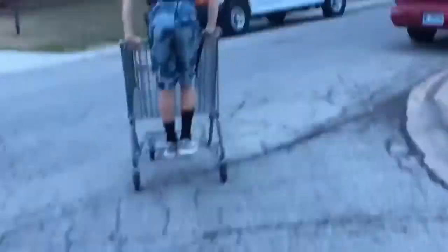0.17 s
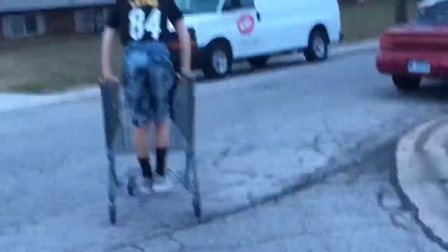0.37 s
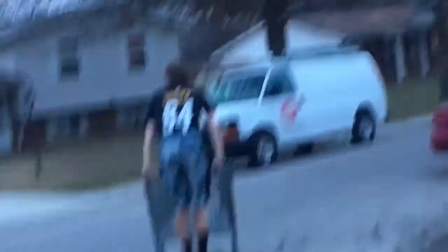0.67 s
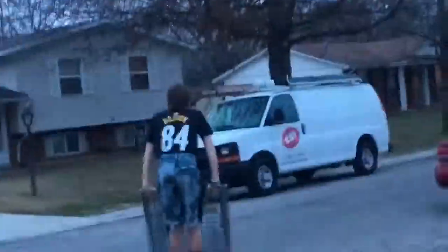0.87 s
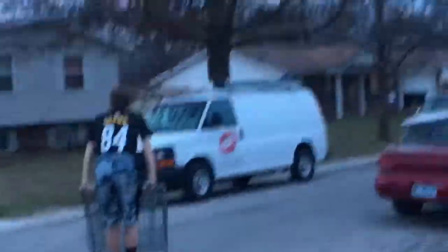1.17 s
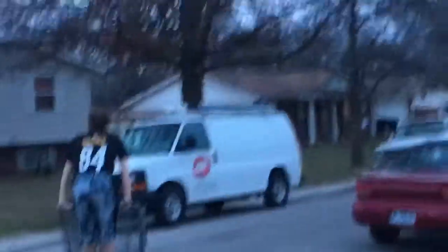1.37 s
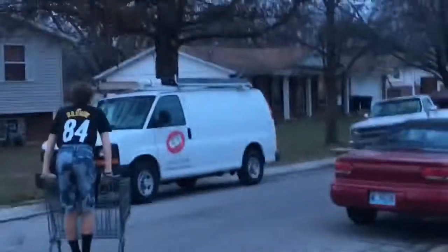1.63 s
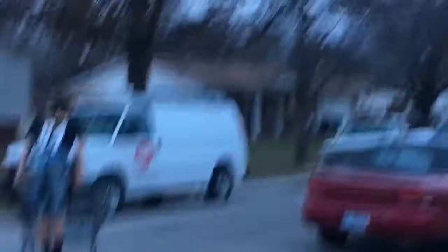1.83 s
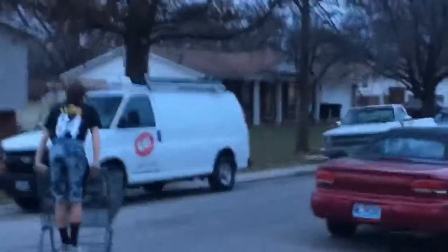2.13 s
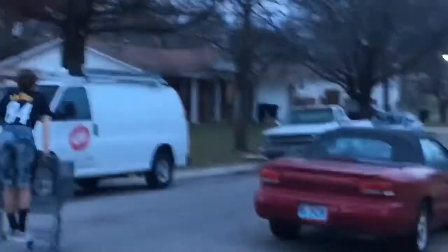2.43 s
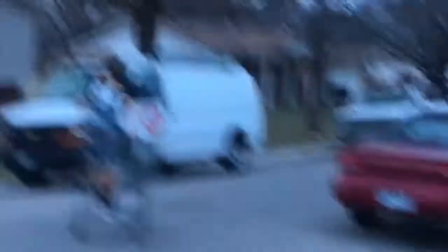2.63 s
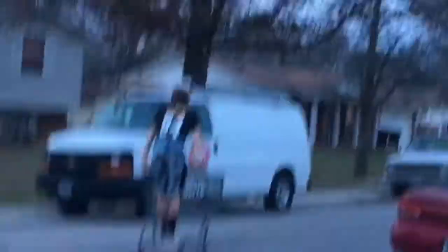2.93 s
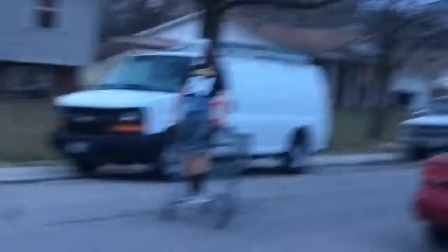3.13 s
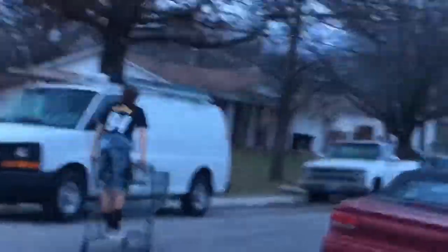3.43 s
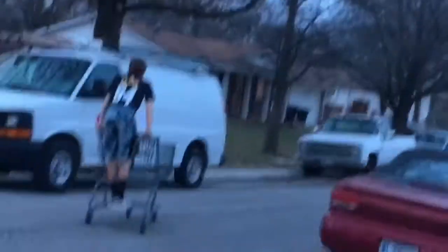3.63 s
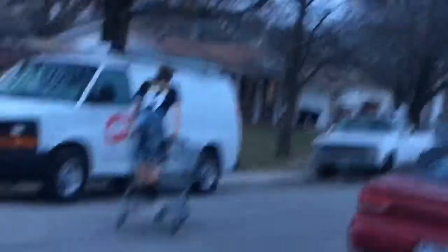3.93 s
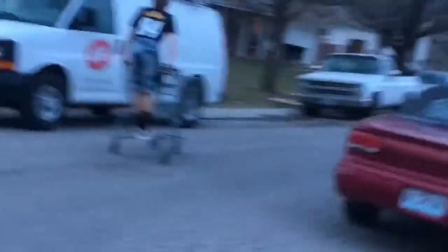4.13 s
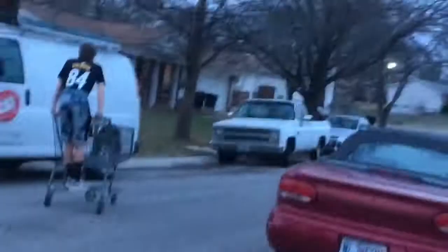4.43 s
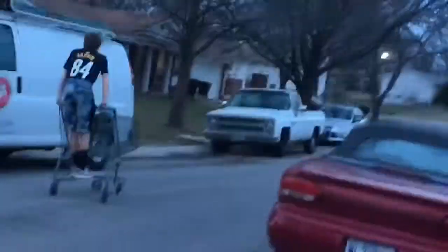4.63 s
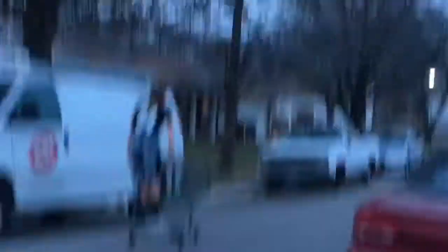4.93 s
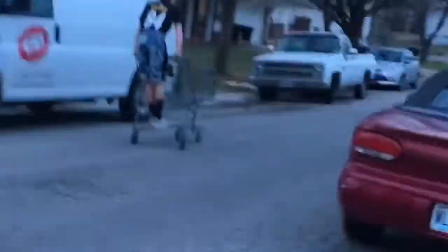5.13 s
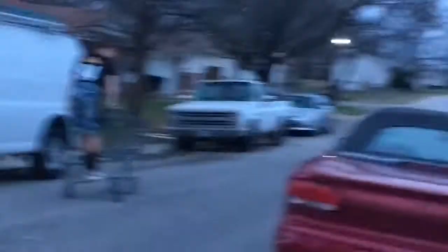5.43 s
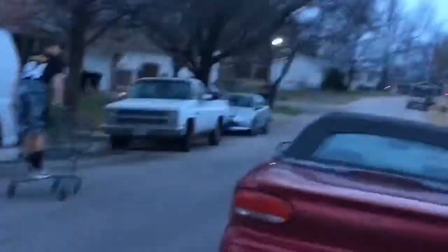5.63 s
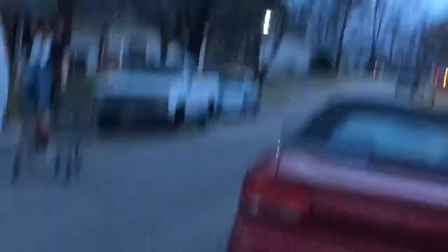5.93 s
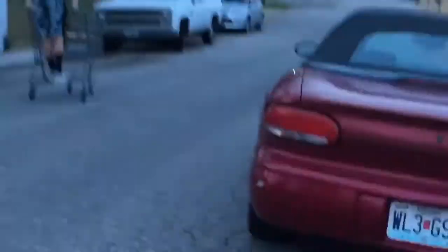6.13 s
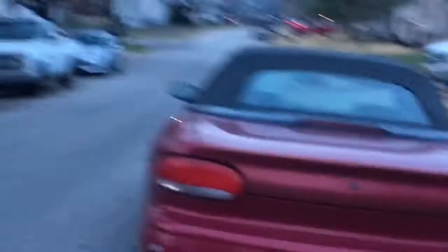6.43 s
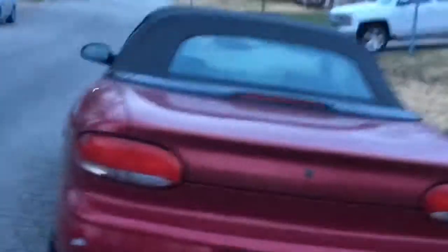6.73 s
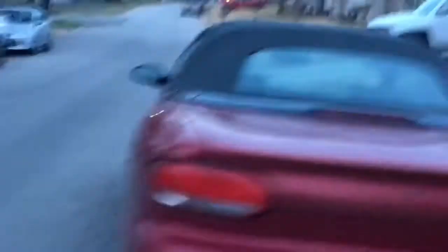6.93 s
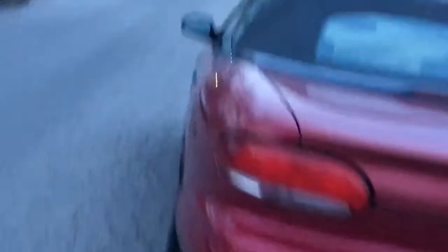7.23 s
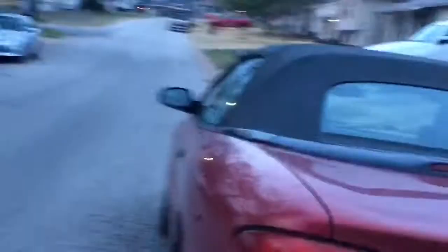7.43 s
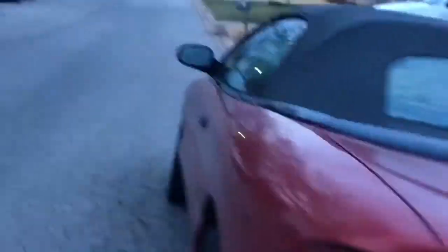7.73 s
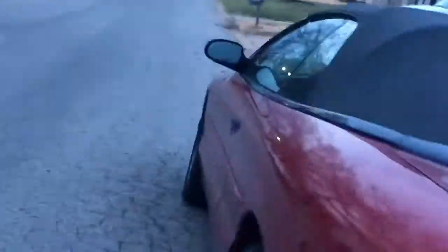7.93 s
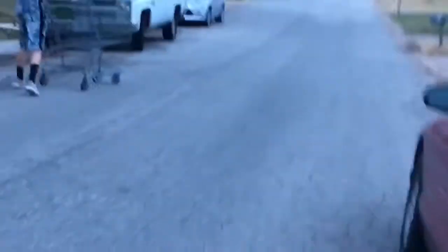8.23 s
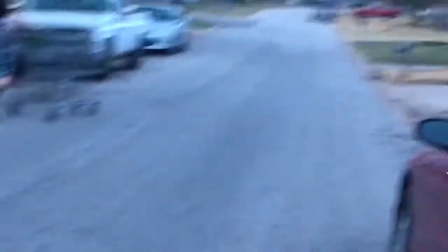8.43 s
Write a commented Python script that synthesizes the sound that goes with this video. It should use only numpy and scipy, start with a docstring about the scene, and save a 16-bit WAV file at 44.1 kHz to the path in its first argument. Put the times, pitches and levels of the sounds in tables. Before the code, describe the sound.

Harsh metallic cart clatter with hard wheels knocking on rough road recedes down a street; nearby gritty footsteps and faint bird whistles follow.

```python
"""Shopping cart on cracked asphalt

A wire shopping cart with a rider rolls away along a quiet street, heard by one microphone.
Hard wheels tapped by stones and a knocked tube frame ring; the shaken wires make a dense jingle.
Grit snaps under the shoes of a walker close by, as short pulses with a noisy edge.
Filtered noise gives a low rumble of wind and microphone handling under an upper background wash,
and a bird gives a few short gliding whistles.
"""
import sys
import numpy as np
from scipy import signal
from scipy.io import wavfile
from scipy.ndimage import uniform_filter1d

SR = 44100
rng = np.random.default_rng(int(sys.argv[2]) if len(sys.argv) > 2 else 0)


def store_pcm(level_fs):
    """Save levels as 16-bit WAV."""
    pcm = np.round(np.clip(level_fs, -1, 1) * 32767).astype(np.int16)
    wavfile.write(sys.argv[1], SR, np.atleast_2d(pcm).T)


N = 379069  # length in samples

# All levels are relative: the functions below add further gains.
# colour of the background noise: f/Hz, level/dB
BACKGROUND_SPECTRUM = [(12, -47), (20, -40), (44, 0), (65, 2), (124, 0), (225, -6), (282, -11),
                       (370, -10.5), (445, -24.5), (520, -12), (600, -14), (780, -9.5), (1320, -120)]
# swells of the background: t/s, low rumble level/dB, upper wash level/dB
BACKGROUND_SWELLS = [(0.02, -66, -58), (0.09, -51, -54), (0.35, -62, -65), (0.4, -57, -49.5),
                     (0.66, -56.5, -60), (0.9, -49, -52.5), (2.04, -49, -55), (2.28, -44.5, -49),
                     (2.57, -56, -57), (3.09, -50.5, -48.5), (3.47, -61, -47.5), (3.52, -50, -48.5),
                     (3.91, -53.5, -45.5), (4.69, -52.5, -51.5), (6.74, -45.5, -53.5), (6.98, -52.5, -50.5),
                     (7.82, -43.5, -53), (8.58, -50.5, -54.5)]
# bird whistles: start t/s, length/s, first f/Hz, last f/Hz, level/dB
CHIRPS = [(1.543, 0.047, 2980, 2920, -43), (1.577, 0.032, 2740, 2610, -44), (7.902, 0.057, 4360, 4280, -48),
          (7.95, .016, 3900, 2800, -52), (8.076, 0.042, 3300, 2650, -48), (8.07, .03, 4300, 4100, -53),
          (8.215, 0.014, 3500, 4000, -52), (8.224, 0.043, 3420, 3240, -53), (8.363, 0.028, 4120, 4540, -52),
          (8.367, 0.042, 3570, 3500, -49.5), (8.394, 0.026, 3380, 2800, -53),
          (8.419, 0.15, 2760, 2700, -57)]
# snaps of grit and knocks of shoes near the microphone: t/s, level/dB, f/Hz, cycles, gritty edge level/dB
GRIT_SNAPS = [(2.264, -25, 1710, 4.1, -10), (2.2645, -21.5, 3860, 4.8, -19), (5.755, -30, 2590, 5.4, -10),
              (5.848, -23, 2180, 3.3, -10.5), (5.868, -26, 2400, 3, -12), (5.882, -27, 2000, 2.5, -10),
              (5.911, -44, 2000, 3, -14), (5.922, -31, 2400, 7, -23), (5.9335, -15, 990, 1.9, -15),
              (5.9342, -17, 2400, 3.5, -34), (5.928, -33, 2600, 4, -14), (5.9515, -34, 2200, 7.1, -16),
              (5.9637, -27, 3580, 4.9, -8), (6.068, -37, 1900, 5.6, -15), (6.178, -42, 2630, 11, -6),
              (6.344, -29.5, 2420, 3.3, -4), (6.368, -32.5, 1100, 4.8, -9), (6.551, -26.5, 1190, 1.7, -8),
              (6.627, -33, 2570, 5.8, -18), (6.844, -25.5, 1230, 4.1, -13), (6.974, -36, 880, 2.7, -8),
              (6.992, -38, 2500, 1.9, 5.5), (7.276, -30, 646, 5.5, -18), (7.348, -37, 1010, 2.5, -10),
              (7.379, -30, 740, 2, -18), (7.494, -36, 1040, 1.6, -14), (7.540, -38, 2630, 2.2, -21),
              (7.638, -33.5, 2710, 13, -13), (8.009, -36, 1500, 3, -16), (8.503, -41, 1790, 63, -5),
              (8.528, -34, 845, 3, -20), (8.574, -35, 2520, 5.7, -16), (8.5745, -36, 1200, 4, -16)]

# cracks and ridges that jolt the whole cart: t/s, wheels level/dB, basket level/dB, frame tube level/dB
JOLTS = [(0.046, -54, -36, -61.0), (0.075, -46, -48, -52), (0.11, -52, -53, -45), (0.163, -64, -55, -62),
         (0.211, -54, -39, -52), (0.247, -43.5, -34.5, -32.5), (0.351, -44.0, -30, -36),
         (0.404, -38, -33, -30), (0.42, -45, -26, -51), (0.476, -45, -31.5, -37), (0.55, -39.5, -31.5, -46),
         (0.597, -46, -41, -58), (0.658, -46, -43, -41), (0.7, -48, -46.0, -37.5),
         (0.802, -36.5, -39, -35.5), (0.853, -40.5, -58, -59), (0.992, -43, -54, -61),
         (1.063, -46, -38, -63.0), (1.212, -41.5, -51, -54), (1.34, -63, -53, -52),
         (1.413, -59, -44.5, -65.0), (1.57, -48, -45, -68), (1.676, -47.5, -43.0, -79),
         (1.807, -43.5, -41, -66), (1.856, -43, -38.5, -62), (1.946, -46.0, -38.5, -68.0),
         (2.186, -55, -49, -66), (2.245, -48, -44, -56), (2.29, -55, -44.5, -62), (2.36, -50, -63, -59),
         (2.46, -50, -52, -41.5), (2.583, -53, -39, -44), (2.744, -43, -40.5, -50), (2.968, -44, -38, -39),
         (3.02, -48, -41.0, -62), (3.112, -43.5, -52.0, -41.5), (3.2, -58, -46, -47), (3.25, -48, -55, -32),
         (3.299, -46, -38, -40), (3.389, -39.5, -42, -34), (3.504, -42.0, -35, -34), (3.606, -60, -54, -45),
         (3.699, -40.5, -35.5, -45), (3.79, -40, -54, -36), (3.848, -40.0, -30.5, -35),
         (3.98, -39.5, -32.5, -55), (4.133, -41.0, -36.5, -78), (4.22, -44, -37.5, -67),
         (4.47, -49.5, -46, -62), (4.519, -46, -40, -45), (4.577, -47, -39, -44.5),
         (4.676, -47.0, -42, -73), (4.8, -48.5, -42.5, -48.0), (4.887, -43, -43.0, -68.0),
         (5.005, -46.5, -64, -46), (5.105, -64, -66, -46), (5.156, -81, -43.5, -65.0),
         (5.26, -50.5, -44.5, -45), (5.335, -50, -64, -58), (5.373, -46.5, -44.5, -50),
         (5.47, -63, -46, -46.0), (5.642, -60, -72, -48), (5.75, -60.0, -53, -53), (5.831, -44.5, -48, -51),
         (5.986, -67, -47.5, -58.0), (6.29, -71, -53, -70.0), (6.324, -51.5, -57, -51),
         (6.44, -72, -48.5, -63), (6.525, -55.0, -47, -56), (6.648, -53.0, -45.5, -75),
         (6.72, -57, -52.0, -60.0), (6.831, -47, -49.5, -51), (6.966, -49.5, -49.5, -48),
         (7.09, -56, -57, -50), (7.146, -57, -57.0, -44), (7.345, -71, -57, -74.0),
         (7.55, -56, -53.5, -75.0), (7.625, -56, -46.5, -47), (7.797, -58, -65.0, -50.0),
         (7.887, -56.0, -61, -57.0), (7.997, -60, -58, -46), (8.02, -57, -52.5, -50),
         (8.227, -71, -52.5, -48.0), (8.484, -66.0, -48.5, -45.0)]
# steady rolling between jolts, set by road roughness and distance: t/s, wheels level/dB, basket level/dB
ROLLING = [(0.0, -39.5, -33.5), (0.45, -49.5, -35), (0.9, -44.5, -39.0), (1.3, -42.5, -39.5),
           (1.65, -51.5, -50.5), (2.1, -46, -41.5), (2.9, -47, -42.5), (3.5, -46, -37.5), (4.0, -43, -35.5),
           (4.4, -47.5, -42), (5.1, -50.5, -49), (5.7, -51.5, -51), (6.25, -53, -52.5), (6.8, -51.5, -51.5),
           (7.5, -59.0, -59.5), (7.9, -50, -50.5), (8.25, -55, -55), (8.6, -51.5, -62)]
# brief dips of the rattle, most just before a jolt; plus means louder: middle t/s, length/s, level/dB
LULLS = [(0.406, 0.015, -4), (1.313, 0.057, -5.5), (1.397, .03, -2.5), (1.64, 0.062, -0.5),
         (1.79, 0.035, 1.5), (1.935, 0.039, -1.5), (2.146, 0.037, -3), (2.545, 0.035, -2.5),
         (2.883, 0.056, -1), (3.182, 0.032, -2), (3.667, 0.056, -1.5), (4.443, 0.034, 0.5),
         (5.15, 0.042, -5), (5.722, 0.047, -3), (6.257, 0.07, -5), (7.32, 0.043, -3), (7.52, 0.082, -2.5),
         (8.1, 0.068, -3), (8.45, .07, 3.5)]
# single stones that a wheel hits squarely: t/s, level/dB
STONE_KNOCKS = [(0.048, -24), (0.056, -21), (0.077, -27), (0.101, -23), (0.108, -19), (0.163, -24),
                (0.195, -31), (0.212, -23), (0.225, -24), (0.25, -31), (0.429, -22), (0.477, -22),
                (0.595, -21), (0.605, -30), (0.658, -21), (0.702, -23), (0.802, -25), (0.853, -17),
                (0.992, -25.5), (1.807, -28), (2.185, -32), (2.461, -34), (2.743, -26), (2.969, -29),
                (3.791, -25), (3.849, -20), (4.134, -26), (4.466, -24), (4.578, -21), (4.929, -32),
                (5.106, -28), (5.335, -31)]
# struck modes (ways of ringing) of the frame, axle first: f/Hz, width/Hz, level/dB
FRAME_MODES = [(624, 51, -14), (860, 92, -7), (839, 27, -21), (932, 72, -1)]
# colour of the wheel sound: f/Hz, level/dB
WHEEL_SPECTRUM = [(280, -36), (480, -24), (607, -11.5), (850, -8.5), (1530, -7), (1960, -8.5), (2290, -8.5),
                  (2590, -5.5), (4500, -16), (5850, -31), (9900, -120)]
# broad resonances of wheels and lower rack: f/Hz, width/Hz, level/dB
RACK_RESONANCES = [(1180, 240, 2.5), (1910, 540, 5.5), (2650, 260, 1), (2690, 230, 1)]
# colour of the basket sound: f/Hz, level/dB
BASKET_SPECTRUM = [(1880, -20.5), (3200, -4), (6170, -2), (6810, 2.5), (7520, 0), (11300, -3), (14200, -3),
                   (15600, -6.5)]
# groups of basket wires of like length: f/Hz, width/Hz, level/dB
WIRE_GROUPS = [(5700, 1200, 1.5), (7000, 600, -1), (6970, 180, -2), (8640, 540, 3.5), (9540, 790, 5.5),
               (10000, 300, 0.5), (11080, 490, 7), (12050, 360, 9), (12840, 200, 8), (14700, 1400, 4.5)]
# changing brightness of the basket's top treble, dullest at the end: t/s, level/dB
BASKET_TREBLE = [(0, -2.5), (3, -2), (5, 0), (6, -5), (7.5, -3.5), (8.6, -8.5)]
# bands cancelled by the road echo, drifting with the path: t/s, low f/Hz, depth 0-1, high f/Hz, depth 0-1
ROAD_NOTCHES = [(0, 1490, 0, 2310, 0.5), (.5, 1500, 0.03, 2270, 0.4), (1.8, 1480, 0, 2450, 0),
                (2.4, 1600, 0.5, 2350, 0.3), (3.2, 1620, 0.45, 2340, .8), (4.0, 1530, 0.65, 2320, 0.8),
                (4.6, 1470, 0.46, 2280, 0.6), (5.2, 1580, 0.83, 2270, 1), (5.8, 1610, 0.07, 2300, 0.9),
                (6.5, 1680, 0.7, 2150, 0.9), (7.5, 1600, 0.1, 2120, .8), (8.6, 1390, 0.65, 2230, 0.9)]

# how each part answers a jolt: (rise s, dying away s, abruptness of the end: 1 = even decay)
WHEELS_SETTLE, BASKET_SETTLE, TUBE_SETTLE = (0.0057, 0.13, 1.5), (0.0099, 0.11, 1.46), (0.0047, 0.046, 0.64)
WHEELS_HUSH = 0.55  # share of a lull that reaches wheels and frame
MAIN_HZ = 855.4  # middle pitch of the main frame tube, which wanders around it
TUBE_BELOW_WHEELS_DB = -8.5  # steady ring of the frame tube, before its own gain
NEAR_CLATTER_DB, NEAR_S = 7.5, 1.2  # extra clatter of the neighbour tubes close by; time to roll out of reach
EDGE_HZ = 15740  # upper limit of the whole sound


def gain_of(db):
    """Turns decibels into a factor."""
    return 10 ** (np.asarray(db) / 20)


def evened(x):
    """Scales a sound to an average strength (rms) of 1."""
    return x / np.sqrt(np.mean(x ** 2) + 1e-20)


def curve(rows, column=1):
    """Draws straight lines between the rows of a table: one column's value at every sample."""
    table = np.array(rows)
    return np.interp(np.arange(N) / SR, table[:, 0], table[:, column])


def drift(length):
    """Random wander of rms 1 that changes over about length seconds."""
    size = max(round(length * SR), 2)
    smooth = uniform_filter1d(rng.standard_normal(N), size)
    return evened(uniform_filter1d(smooth, size))


def add(mix, s, sound):
    """Mixes a sound in, starting at s seconds."""
    part = mix[max(round(s * SR), 0):][:len(sound)]
    part += sound[:len(part)]


def ringing(hits, ring):
    """Every hit starts its own copy of the ring, as loud as the hit."""
    return signal.oaconvolve(hits, ring)[:N]


def colour(x, points, peaks=()):
    """Shapes a sound by a spectrum with resonance humps; nothing rings before it is struck."""
    hz = np.fft.rfftfreq(8192, 1 / SR)
    f, db = np.transpose(points)
    level_db = np.maximum(np.interp(np.log(hz + 1), np.log(f + 1), db), -100)
    for centre, width, up_db in peaks:
        level_db = level_db + up_db / (1 + (2 * (hz - centre) / width) ** 2)
    mirrored_db = np.r_[level_db, level_db[-2:0:-1]]
    log_gain = np.log(gain_of(mirrored_db))
    # minimum phase: the energy comes as early as this spectrum allows
    phase = -signal.hilbert(log_gain).imag
    ring = np.fft.ifft(np.exp(log_gain + 1j * phase)).real[:4096]
    return signal.oaconvolve(x, ring / np.linalg.norm(ring))[:len(x)]


def resonate(x, hz, width):
    """Keeps a narrow band around a moving frequency, with gain 1 at its middle."""
    turn = np.exp(2j * np.pi * np.cumsum(hz) / SR)
    r = np.exp(-np.pi * width / SR)
    # shift the band down to zero, smooth it there, then shift it back
    low = signal.lfilter([1 - r], [1, -r], x / turn)
    return 2 * (turn * low).real


def taps(per_s, spread_db):
    """Small impacts at random moments; a few are large."""
    size = gain_of(spread_db * np.minimum(rng.exponential(1, N), 5))
    struck = rng.random(N) < per_s / SR
    return size * struck * rng.choice([-1., 1.], N)


def jolts(rows, column, bounce_s):
    """Each jolt is a blow followed by a quickly dying run of rebounds, made of fading noise."""
    out, t = np.zeros(N), np.arange(round(.1 * SR)) / SR
    for row in rows:
        rebounds = np.exp(-t / bounce_s) * rng.standard_normal(len(t))
        add(out, row[0], gain_of(row[column]) * rebounds)
    return out


def many_modes(t60):
    """Ring with partials so crowded that it is fading noise, down 60 dB after t60 seconds."""
    t = np.arange(round(.2 * SR)) / SR
    ring = gain_of(-60 * t / t60) * rng.standard_normal(len(t))
    return ring / np.linalg.norm(ring)


def shaking(steady_db, column, settle, hush):
    """Strength of a part's rattle: steady rolling plus a quick rise and slow settling after every jolt."""
    rise_s, decay_s, abruptness = settle
    t, kicks, lull_db = np.arange(SR // 2) / SR, np.zeros(N), np.zeros(N)
    for row in JOLTS:
        kicks[round(row[0] * SR)] += gain_of(2 * row[column])  # doubled dB: power
    for s, length, db in LULLS:
        add(lull_db, s - length, db * np.hanning(round(2 * length * SR)))
    answer = (1 - np.exp(-t / rise_s)) * np.exp(-(t / decay_s) ** abruptness)
    jolt_power = abs(ringing(kicks, answer ** 2))
    return gain_of(hush * lull_db) * np.sqrt(gain_of(2 * steady_db) + jolt_power)


def rolling():
    """Strength of the knocking of wheels and rack."""
    return shaking(curve(ROLLING), column=1, settle=WHEELS_SETTLE, hush=WHEELS_HUSH)


def background():
    """A low, slightly lumpy rumble of wind and microphone handling, under an upper wash with its own swells."""
    lumps_db = 2.45 * drift(0.045)
    noise = colour(rng.standard_normal(N), BACKGROUND_SPECTRUM)
    rumble = signal.sosfiltfilt(signal.butter(2, 135, fs=SR, output="sos"), noise)
    wash = noise - rumble
    rumble_gain = gain_of(curve(BACKGROUND_SWELLS) + lumps_db)
    wash_gain = gain_of(curve(BACKGROUND_SWELLS, column=2))
    return rumble_gain * evened(rumble) + wash_gain * evened(wash)


def bird():
    """Short gliding whistles from a distance, fluttering and smeared by echoes off the houses."""
    out = np.zeros(N)
    for s, length, first_hz, last_hz, db in CHIRPS:
        hz = np.linspace(first_hz, last_hz, round(length * SR))
        hz = hz * (1 + 0.09 * uniform_filter1d(rng.standard_normal(len(hz)), 150))
        whistle = np.sin(2 * np.pi * np.cumsum(hz) / SR)
        add(out, s, gain_of(db - 1.5) * signal.windows.tukey(len(hz), .7) * whistle)
    out = out * gain_of(4 * drift(.004))  # flutter in loudness
    return out + gain_of(-5) * ringing(out, many_modes(.12))


def snaps():
    """Dry pulses of a few cycles that swell for an instant before their peak, each with a gritty edge."""
    out, t = np.zeros(N), np.arange(-.004, .026, 1 / SR)  # the peak is at t = 0
    for s, db, hz, cycles, grit_db in GRIT_SNAPS:
        life = hz * t / max(cycles, .3)
        pulse = np.exp(np.where(t < 0, 5.0, -2.5) * life) * np.cos(2 * np.pi * hz * t)
        noise = np.convolve(rng.standard_normal(len(t)), [.6, 1, .6], "same")
        grit = gain_of(grit_db) * np.exp(-abs(t) / 0.00077) * noise
        add(out, s + t[0], gain_of(db) * (pulse - pulse.mean() + grit))
    return out


def frame():
    """The main tube sings almost steadily; taps and jolts ring its neighbours, and the axle follows the wheels."""
    t = np.arange(round(.2 * SR)) / SR
    modes = []
    for hz, width, db in FRAME_MODES:
        fade = np.exp(-np.pi * width * t)  # a wider resonance dies away sooner
        modes.append(gain_of(db) * np.sqrt(width) * fade * np.sin(2 * np.pi * hz * t))
    axle = evened(ringing(taps(400, 4.0), modes[0]))
    neighbours = evened(ringing(taps(900, 3.5), sum(modes[1:])))
    main_hz = MAIN_HZ + 10 * drift(0.0272)
    main = gain_of(3.1 * drift(0.022)) * np.sin(2 * np.pi * np.cumsum(main_hz) / SR)
    # close by, the neighbours clatter over the ring of the main tube
    nearness = np.exp(-(np.arange(N) / SR / NEAR_S) ** 2)
    clatter = gain_of(-3 + NEAR_CLATTER_DB * nearness)
    tube = (evened(main) + clatter * neighbours) / np.sqrt(1 + clatter ** 2)
    tube_db = curve(ROLLING) + TUBE_BELOW_WHEELS_DB
    tube_shake = shaking(tube_db, column=3, settle=TUBE_SETTLE, hush=WHEELS_HUSH)
    tube = gain_of(2.5 + 2.0 * drift(0.052)) * tube_shake * tube
    blows = ringing(jolts(JOLTS, column=3, bounce_s=0.0063), sum(modes))
    return gain_of(-9.5) * rolling() * axle + tube + gain_of(-39.5) * blows


def pings():
    """Loose parts of the rack are struck alone and sound short pitched ticks."""
    t, out = np.arange(round(.06 * SR)) / SR, 0
    for hz in np.geomspace(950, 3800, num=10):
        tick = gain_of(-60 * t / 0.023) * np.sin(2 * np.pi * hz * t)
        out = out + ringing(taps(25, 1.8), tick)
    return evened(out)


def wheels():
    """Stones tap the hard wheels; the load shifts between contact points, so the dull rings change."""
    chatter = np.zeros(N)
    for _ in range(8):  # contact points
        load = gain_of(2.35 * drift(0.064))
        chatter += load * ringing(taps(110, 2.56), many_modes(0.066))
    chatter = chatter / np.sqrt(uniform_filter1d(chatter ** 2, SR // 8))  # the total load stays even
    rattle = colour(chatter + gain_of(-14.5) * pings(), WHEEL_SPECTRUM, RACK_RESONANCES)
    steady = gain_of(1.64) * rolling() * evened(rattle)
    knocks = jolts(STONE_KNOCKS, column=1, bounce_s=0.0021)
    return steady + gain_of(-5.5) * colour(knocks, WHEEL_SPECTRUM, RACK_RESONANCES)


def basket():
    """Loose wires chatter against each other at many places, each ringing with its own partials."""
    chatter = sum(ringing(taps(620, 3.07), many_modes(0.07)) for _ in range(8))
    shake = shaking(curve(ROLLING, column=2), column=2, settle=BASKET_SETTLE, hush=1)
    jingle = evened(colour(chatter, BASKET_SPECTRUM, WIRE_GROUPS))
    steady = gain_of(2.55) * shake * jingle
    blows = ringing(jolts(JOLTS, column=2, bounce_s=0.004), many_modes(0.09))
    bright = steady + gain_of(7.5) * colour(blows, BASKET_SPECTRUM, WIRE_GROUPS)
    dull = signal.lfilter(*signal.butter(2, 9500, fs=SR), bright)
    # harder shakes reach the highest partials
    surge_db = 20 * np.log10(shake / uniform_filter1d(shake, SR // 2))
    brightness = np.clip(gain_of(curve(BASKET_TREBLE) + 0.54 * surge_db), 0, 2.5)
    return brightness * bright + (1 - brightness) * dull


def over_road(x):
    """Direct sound and road echo cancel in two drifting bands."""
    for column, width_hz in ((1, 360), (3, 210)):
        depth = np.clip(curve(ROAD_NOTCHES, column=column + 1), 0, 1)
        x = x - depth * resonate(x, curve(ROAD_NOTCHES, column=column), width_hz)
    return x


def scene():
    """Background, bird, walker and cart reach a single microphone, so both channels are the same."""
    cart = over_road(frame() + wheels() + basket())
    mono = background() + bird() + snaps() + cart
    return np.array([mono, mono])


def record(dry):
    """Cuts off everything above the upper limit with a steep filter."""
    low_pass = signal.firwin(1023, EDGE_HZ, window=("kaiser", 10), fs=SR)
    return signal.oaconvolve(dry, low_pass[None], "same")


dry = scene()
out = record(dry)
store_pcm(out)
```